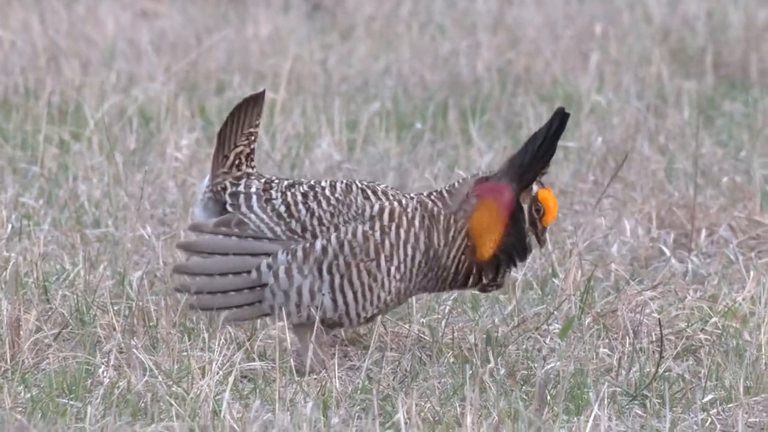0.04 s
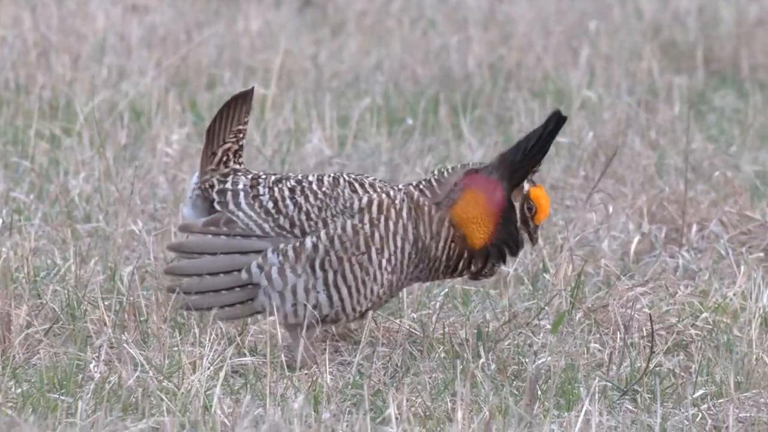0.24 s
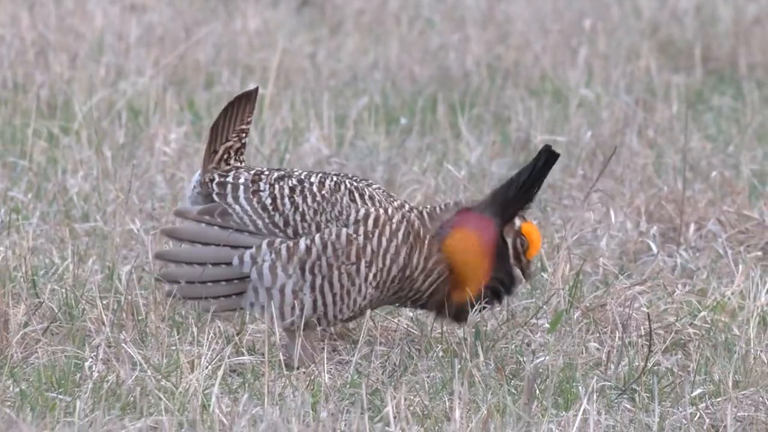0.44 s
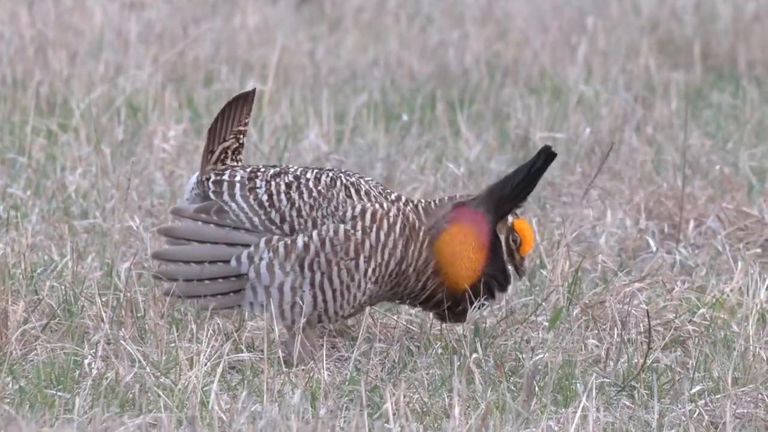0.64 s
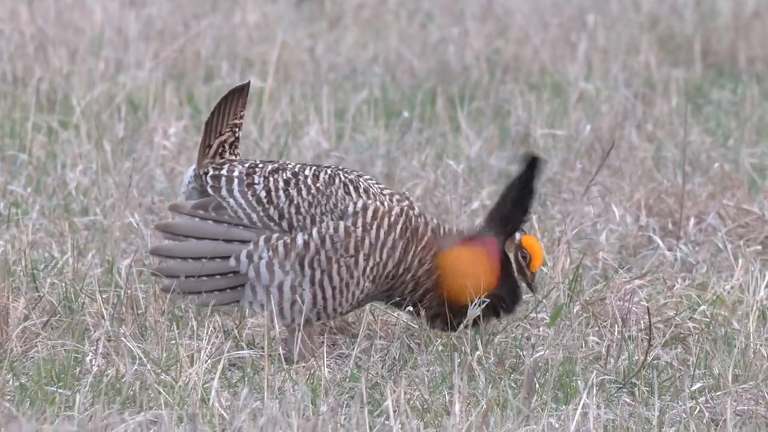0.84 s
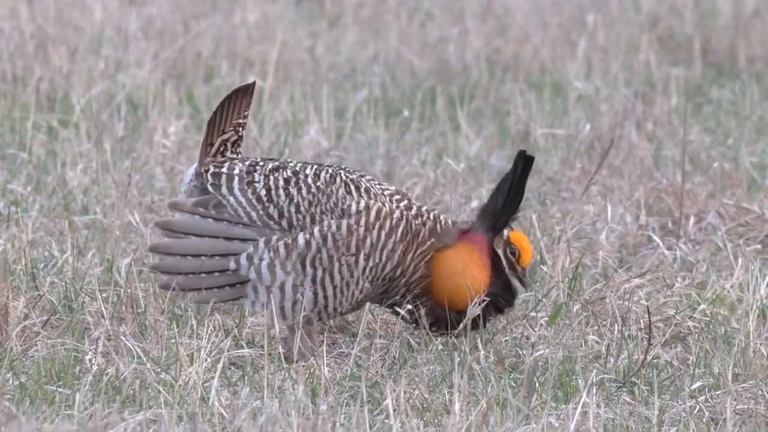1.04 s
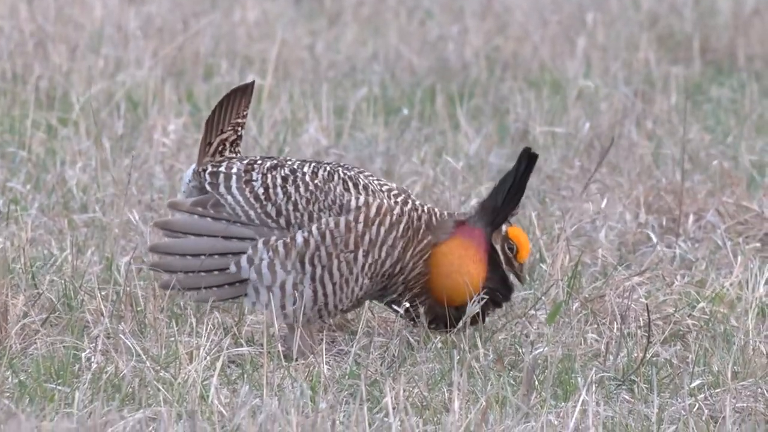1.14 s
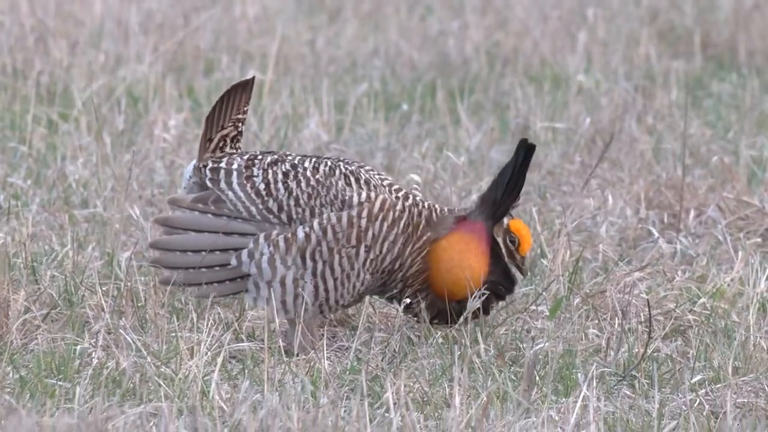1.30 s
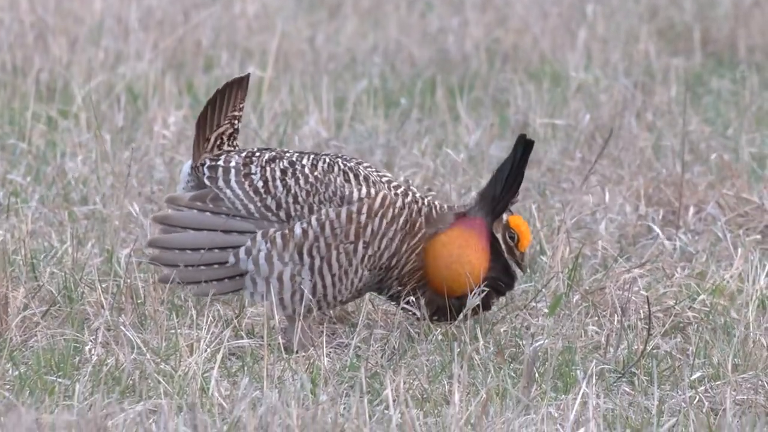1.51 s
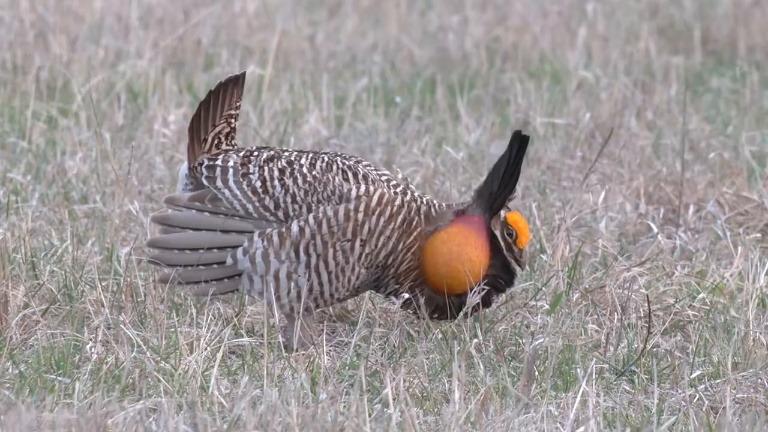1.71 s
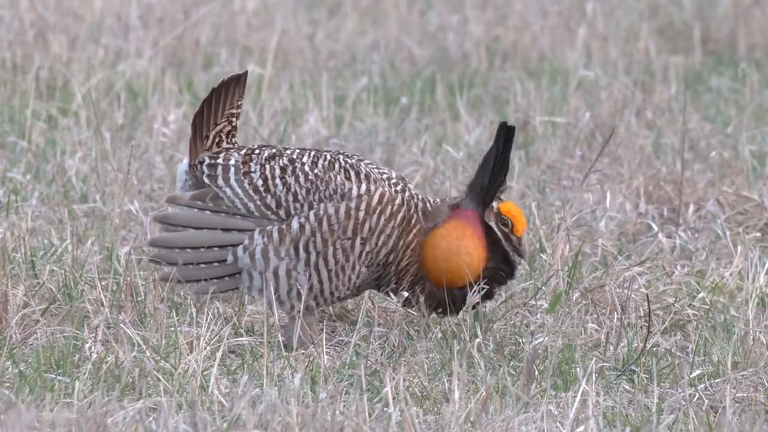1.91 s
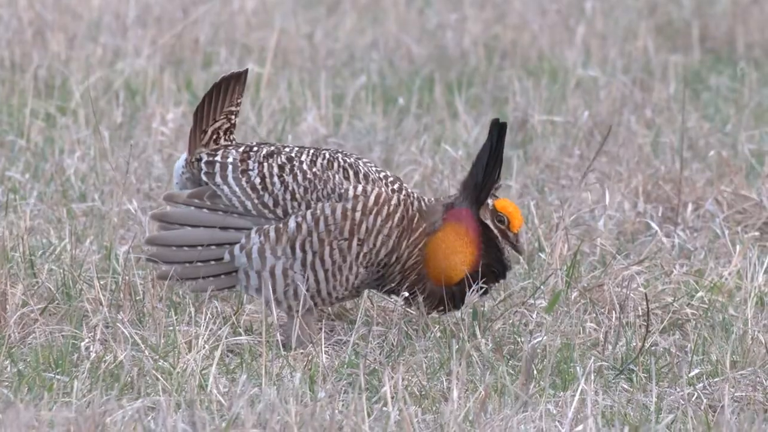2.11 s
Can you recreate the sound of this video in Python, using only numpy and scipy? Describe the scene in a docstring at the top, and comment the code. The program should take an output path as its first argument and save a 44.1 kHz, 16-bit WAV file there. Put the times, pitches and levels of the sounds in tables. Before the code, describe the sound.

Prairie chickens boom in low, almost pure hoots, swelling at 0.3 seconds and wavering against each other until one holds a note alone from 1.5 to 1.9 seconds. A softer hoot starts just after 2 seconds. Farther off, two gliding whoops fill the first second, then five faint, falling nasal cackles follow. Tiny chirps and dry grass ticks sit over a soft wind that dies down.

```python
"""Prairie chickens on open grassland.

Their air sacs boom almost pure tones near 300 Hz, which beat against each other until one
bird holds a note alone. Farther off, others whoop and cackle, harmonics shaped by the throat.
Dry grass ticks and small birds chirp over a soft rumble of wind."""
import sys
import numpy as np
from scipy import signal
from scipy.fft import rfft, irfft, next_fast_len
from scipy.io import wavfile
from scipy.ndimage import uniform_filter1d, map_coordinates

SR = 44100
rng = np.random.default_rng(int(sys.argv[2]) if len(sys.argv) > 2 else 0)


def pcm_store(signal):
    """Save signal as 16-bit PCM."""
    levels = np.round(np.clip(np.atleast_2d(signal), -1, 1) * 32767)
    wavfile.write(sys.argv[1], SR, levels.astype(np.int16).T)


N = 94815
T = np.arange(N) / SR


def amp(db):
    """Decibels to gain."""
    return 10 ** (np.asarray(db) / 20)


def unit(x):
    """Scale to rms 1."""
    return x / np.sqrt(np.mean(x ** 2) + 1e-20)


def along(points, hz):
    """Interpolate (frequency [Hz], value) points on a log axis."""
    knots_hz, values = np.transpose(points)
    return np.interp(np.log(hz + 1), np.log(knots_hz + 1), values)


def curves(rows):
    """One per-sample curve for each column after the time."""
    times_s, *columns = np.transpose(rows)
    return [np.interp(T, times_s, column) for column in columns]


def wobble(knots_per_s):
    """Smooth random curve."""
    return map_coordinates(rng.standard_normal(int(N * knots_per_s / SR) + 4), [T * knots_per_s])


def filtered(x, response):
    """Apply the gain response(hz) by FFT."""
    size = next_fast_len(N + SR // 4)
    return irfft(rfft(x, size) * response(np.fft.rfftfreq(size, 1 / SR)), size)[:N]


def noise(spectrum):
    """Noise of rms 1, shaped by (frequency [Hz], relative density [dB]) points."""
    return unit(filtered(rng.standard_normal(N), lambda hz: amp(along(spectrum, hz))))


def gate(start_s, end_s, attack_s, release_s):
    """Trapezoid envelope, zero outside start to end."""
    return np.clip((T - start_s) / attack_s, 0, 1) * np.clip((end_s - T) / release_s, 0, 1)


def phase_of(hz):
    """Running phase [rad] of a pitch curve."""
    return 2 * np.pi * np.cumsum(hz) / SR


def voice(hz, throat, overtones_db, count):
    """Harmonics of a pitch curve, weighted by throat resonances."""
    phase = phase_of(hz)
    return sum(amp(along(throat, k * hz) + overtones_db * (k > 1)) * np.sin(k * phase)
               for k in range(1, count + 1))


def booms():
    """Swollen air sacs pass the fundamental and almost nothing else."""
    # one boom each: (time [s], pitch [Hz], level [dB])
    lead_boom = [(0.0, 300.4, -34.4), (0.072, 329.3, -34), (0.11, 329.05, -44), (0.15, 328.8, -31.5),
                 (0.208, 328.4, -27.5), (0.281, 310.9, -17), (0.303, 304.0, -11.3), (0.339, 292.7, -8.4),
                 (0.37, 302.0, -8.2), (0.389, 281.6, -17.4), (0.471, 265.8, -17.4), (0.508, 267.1, -19.0),
                 (0.532, 322.2, -14.6), (0.553, 354.2, -19.3), (0.574, 294.3, -18), (0.607, 278.7, -14.7),
                 (0.668, 273.1, -14.4), (0.698, 260.2, -24.9), (0.74, 355.9, -20.0), (0.76, 372.7, -13.8),
                 (0.766, 282.3, -18.7), (0.818, 279.6, -13.2), (0.856, 295.0, -20.8), (0.894, 273.8, -23.0),
                 (0.93, 279.0, -15.0), (1.082, 285.3, -19.3), (1.126, 278.2, -16.1), (1.168, 304.7, -14.4),
                 (1.275, 294.0, -14.6), (1.356, 296.7, -13.6), (1.385, 292.8, -14.8), (1.435, 297.5, -8.9),
                 (1.62, 300.9, -8.8), (1.819, 303.1, -9.7), (1.861, 300.5, -16.5), (1.893, 298.6, -41.3)]
    second_boom = [(0.27, 344.0, -45.0), (0.325, 352.6, -28.7), (0.378, 318.2, -20.4),
                   (0.414, 337.0, -20.2), (0.461, 316.5, -11.2), (0.496, 320.1, -16.7),
                   (0.533, 295.6, -10.6), (0.581, 305.9, -27), (0.654, 308.0, -22.3), (0.697, 275.5, -19.1),
                   (0.728, 300.8, -7.7), (0.758, 317.8, -29.4), (0.816, 298.8, -15.0),
                   (0.872, 316.8, -27.9), (0.96, 295.0, -29.5), (1.017, 321.2, -16.0), (1.068, 309.1, -9.8),
                   (1.144, 306.3, -10.7), (1.162, 273.4, -26.0), (1.22, 327.2, -19.9),
                   (1.272, 318.5, -14.0), (1.328, 308.7, -11.3), (1.403, 299.4, -15.1),
                   (1.452, 298.7, -36.8)]
    far_boom = [(0.86, 326.6, -42.0), (0.921, 326.2, -26.4), (0.99, 334.5, -27.5), (1.051, 330.7, -23.1),
                (1.121, 328.7, -41.0)]
    closing_boom = [(2.059, 303, -53), (2.088, 305.4, -28), (2.12, 311, -33.5), (2.15, 326.3, -27)]
    ease_s, fade_s = 0.0016, 0.0087
    octave_db, flutter_db = -53, 0.25
    out = np.zeros(N)
    for rows in (lead_boom, second_boom, far_boom, closing_boom):
        hz, db = uniform_filter1d(np.array(curves(rows)), int(ease_s * SR), axis=1)
        phase = phase_of(hz)
        tone = np.sin(phase) + amp(octave_db) * np.sin(2 * phase)
        envelope = gate(rows[0][0] - fade_s, rows[-1][0] + fade_s, fade_s, fade_s)
        out += tone * amp(db + flutter_db * wobble(90)) * envelope
    return out


def whoops():
    """Two clear gliding calls that brighten as the bird pushes harder."""
    # calls: (time [s], pitch [Hz], level [dB], overtone gain [dB])
    sliding_call = [(0, 525.6, -40, -25), (.04, 465, -36.5, -22), (.07, 405.7, -33, -27),
                    (.11, 382, -29, -30), (.17, 407.4, -32.5, -28), (.28, 470, -49, -24),
                    (.37, 505, -42, -13.5), (.45, 555, -37, -4), (.51, 612, -33, -3),
                    (.549, 682, -36, -13.5), (.572, 380, -43, -16)]  # dips, rises, breaks off
    held_call = [(.71, 450, -47, -16), (.76, 512, -38, -21), (.80, 535, -34, -12), (.838, 550, -32.5, 0),
                 (.858, 565, -32.5, -2.5), (.905, 564, -33.5, 0), (.925, 555, -33, 1.5),
                 (.997, 553, -34, 5), (1.026, 400, -50, 6)]  # drops at its end
    # throat responses: (frequency [Hz], gain [dB])
    sliding_throat = [(670, -0.5), (900, -41.5), (3000, -38), (3350, -21), (3680, -18), (3900, -46.5)]
    held_throat = [(600, 1.5), (1120, -9), (1680, -23), (2230, -28), (2800, -39), (3350, -37), (3850, -23),
                   (3950, -25), (4450, -44), (5020, -32), (5600, -46.5)]
    jitter, waver_db, shimmer_db, fade_s = 0.003, 1.0, 0.8, 0.017
    out = np.zeros(N)
    for rows, throat in ((sliding_call, sliding_throat), (held_call, held_throat)):
        hz, db, overtones_db = curves(rows)
        pitch_hz = hz * (1 + jitter * wobble(120))
        tone = voice(pitch_hz, throat, overtones_db + waver_db * wobble(35), count=10)
        envelope = gate(rows[0][0], rows[-1][0], fade_s, fade_s)
        out += tone * amp(db + shimmer_db * wobble(60)) * envelope
    return out


def air():
    """Steady hush of the plain and a low wind that dies down."""
    # noise spectra: (frequency [Hz], relative density [dB])
    hush_spectrum = [(45, -14), (125, 0.5), (220, -7.5), (400, -10), (700, -15), (1200, -27.5),
                     (2500, -38.5), (5000, -41.5), (15500, -49)]
    wind_spectrum = [(30, -10), (80, 1), (150, 4.5), (220, -7.5), (400, -23.5), (2000, -66)]
    # gusts: (time [s], level [dB])
    gusts = [(0, -32), (.6, -42), (.74, -31), (.87, -42.5), (1.15, -39.5), (1.4, -53), (2.15, -48)]
    hush_db, drift_db, buffet_db = -40.5, 0.38, 2.8
    wind_db, = curves(gusts)
    hush = amp(hush_db + drift_db * wobble(11)) * noise(hush_spectrum)
    wind = amp(wind_db + buffet_db * wobble(37)) * noise(wind_spectrum)
    return hush + wind


def chirps():
    """Small distant birds: sine slurs made scratchy by fast pitch jitter."""
    # slurs: (start [s], length [s], from [Hz], to [Hz], level [dB])
    slurs = [(0.032, .06, 3700, 4500, -57), (.175, .045, 4220, 5200, -62), (.71, .045, 9300, 8120, -64),
             (.243, 0.042, 5000, 5400, -59)]
    jitter, jitter_per_s = 0.075, 1500
    out = np.zeros(N)
    for start_s, length_s, from_hz, to_hz, db in slurs:
        end_s = start_s + length_s
        pitch_hz = np.interp(T, [start_s, end_s], [from_hz, to_hz]) * (1 + jitter * wobble(jitter_per_s))
        out += amp(db) * gate(start_s, end_s, length_s / 2, length_s / 2) * np.sin(phase_of(pitch_hz))
    return out


def grass_ticks():
    """Dry stems snap in short bursts of band-passed noise."""
    # snaps: (time [s], level [dB], centre [Hz], t60 [s])
    snaps = [(.139, -45, 2600, .035), (.171, -46, 2530, 0.033), (.670, -43.5, 4310, 0.024),
             (.997, -52.5, 6930, .06), (1.08, -50.5, 4810, .035), (1.582, -46, 5250, .018),
             (2.123, -44.5, 3250, .022)]
    attack_s = 0.0012
    out = np.zeros(N)
    for start_s, db, centre_hz, t60_s in snaps:
        age_s = np.maximum(T - start_s, 0)
        white = rng.standard_normal(N)
        # two band-pass stages, Q = 1
        burst = unit(filtered(white, lambda hz: 1 / (1 + (hz / centre_hz - centre_hz / (hz + 1)) ** 2)))
        out += amp(db - 60 * age_s / t60_s) * (1 - np.exp(-age_s / attack_s)) * burst
    return out


def grass_rustle():
    """Sparse faint crackle of dry grass."""
    snaps_per_s, base_db, spread_db, t60_s = 40, -62.5, 2.4, 0.01
    spectrum = [(800, -18.0), (4500, 0.5), (15000, -12.5)]  # (frequency [Hz], relative density [dB])
    onsets = rng.random(N) < snaps_per_s / SR
    snaps = onsets * amp(base_db + spread_db * rng.exponential(size=N).clip(0, 3))
    envelope = signal.fftconvolve(snaps, amp(-60 * T[:SR // 20] / t60_s))[:N]
    return envelope * noise(spectrum)


def cackles():
    """Nasal notes, each falling unsteadily by over an octave and turning raspy."""
    # notes: (start [s], length [s], starting pitch [Hz], level [dB])
    notes = [(1.109, 0.081, 607.7, -59.5), (1.293, .08, 557.4, -57.5), (1.447, .12, 603, -54.5),
             (1.667, .11, 628.5, -56.5), (1.92, .12, 652.6, -52.5)]
    # throat response: (frequency [Hz], gain [dB])
    throat = [(800, -9), (1300, -10.5), (1700, 0), (2050, -2.5), (2500, -11), (3200, -21.5), (5000, -39.5)]
    fall, jitter, wander = 0.6, 0.016, 0.016  # fractions of the pitch
    fall_exponent, rasp_db, flutter_db = 1.2, -3.5, 1
    attack_s, release_s = 0.018, 0.041
    out = np.zeros(N)
    for start_s, length_s, start_hz, db in notes:
        progress = np.clip((T - start_s) / length_s, 0, 1)
        pitch_hz = start_hz * (1 - fall * progress ** fall_exponent)
        pitch_hz *= 1 + jitter * wobble(400) + wander * wobble(70)
        pulses = 1 + np.cos(phase_of(pitch_hz))
        rasp = amp(rasp_db) * progress ** 2 * pulses * noise(throat)
        tone = voice(pitch_hz, throat, overtones_db=0, count=11)
        envelope = gate(start_s, start_s + length_s, attack_s, release_s)
        out += amp(db + flutter_db * wobble(150)) * envelope * (tone + rasp)
    return out


def field_scatter(calls):
    """Distant calls gain a faint tail scattered by the grassland."""
    t60_s, tail_db = 0.37, -13.5
    age_s = T[:SR // 2]
    tail = rng.standard_normal(len(age_s)) * amp(-60 * age_s / t60_s)
    return calls + amp(tail_db) * signal.fftconvolve(calls, tail / np.linalg.norm(tail))[:N]


def scene():
    """Mono mix: booms in front, callers behind, grass and air around them."""
    birds = booms() + whoops() + field_scatter(cackles() + chirps())
    return (birds + grass_ticks() + grass_rustle() + air())[None]


def record(dry):
    """Brick-wall low-pass."""
    cutoff_hz = 15650
    return filtered(dry[0], lambda hz: hz < cutoff_hz)[None]


dry = scene()
out = record(dry)
pcm_store(out)
```